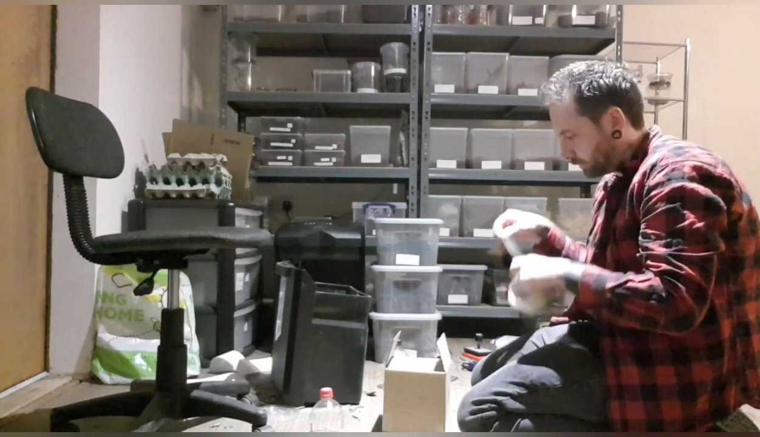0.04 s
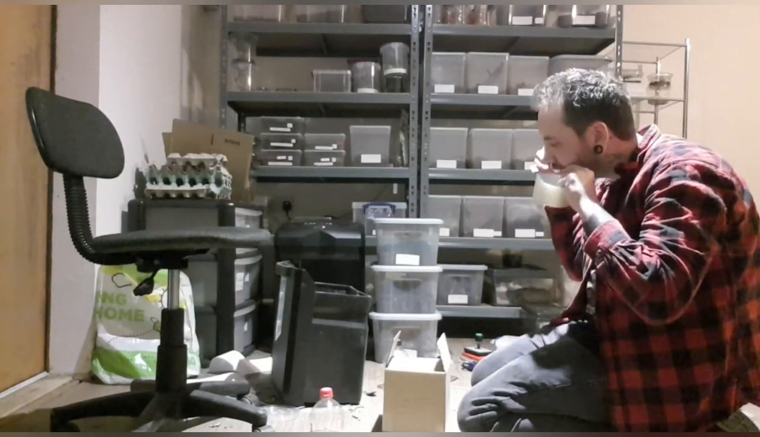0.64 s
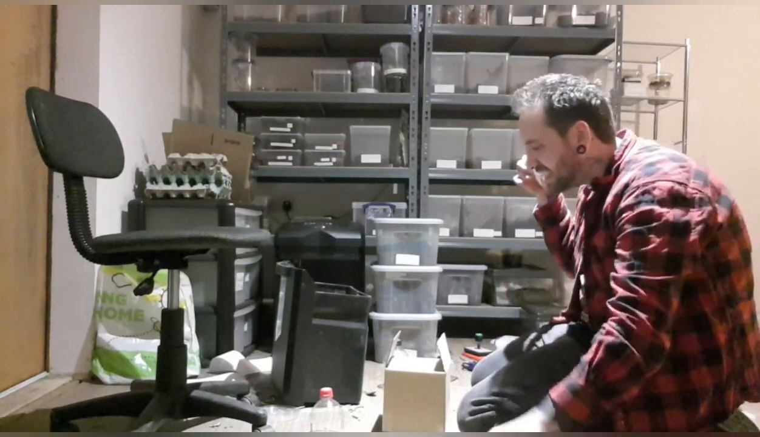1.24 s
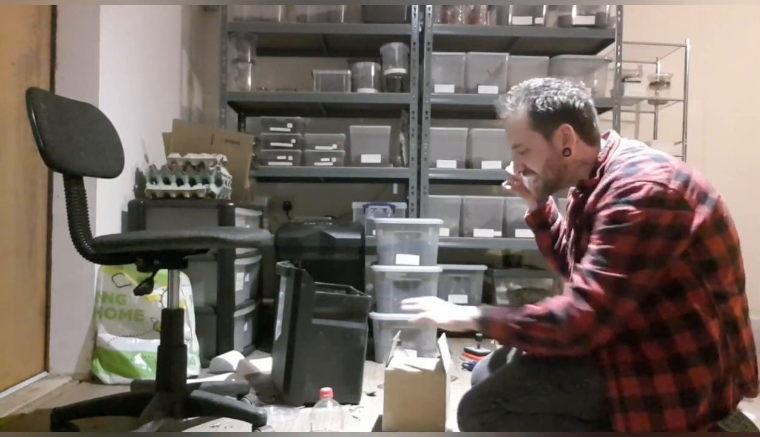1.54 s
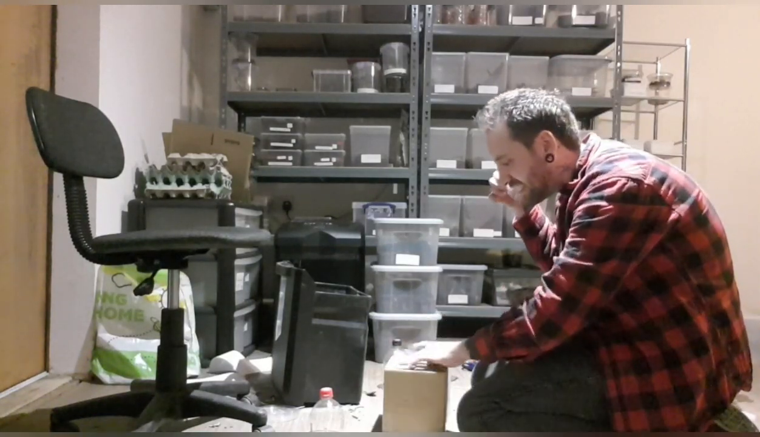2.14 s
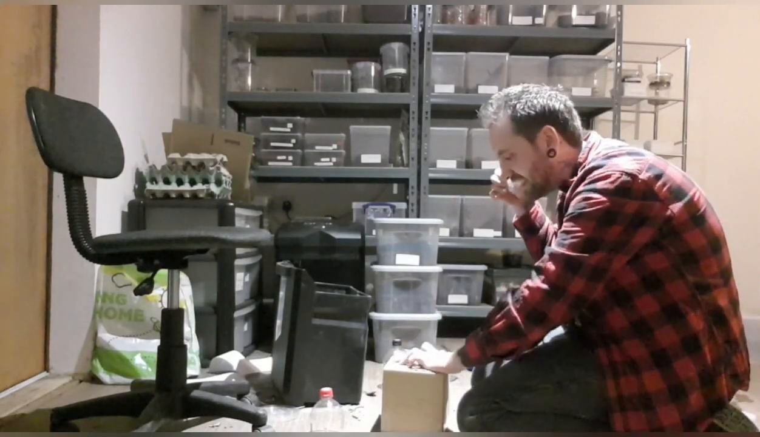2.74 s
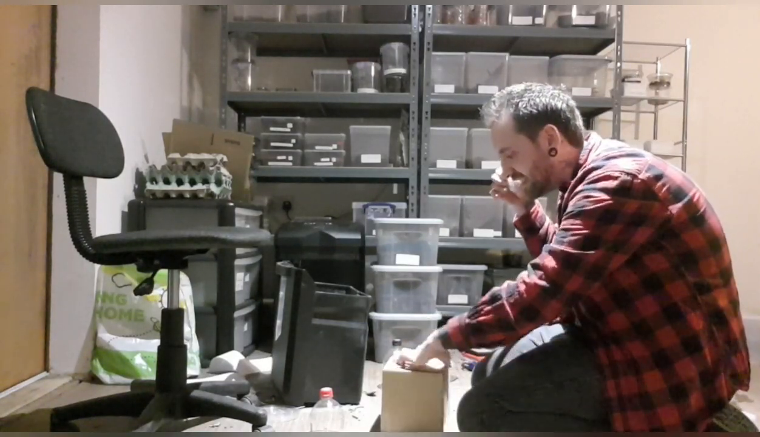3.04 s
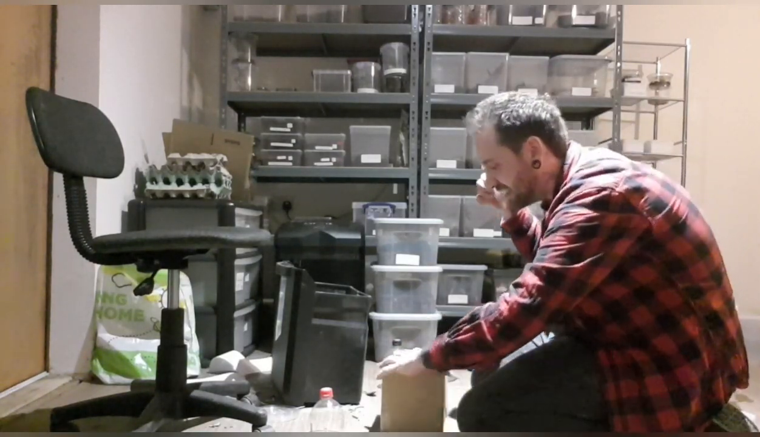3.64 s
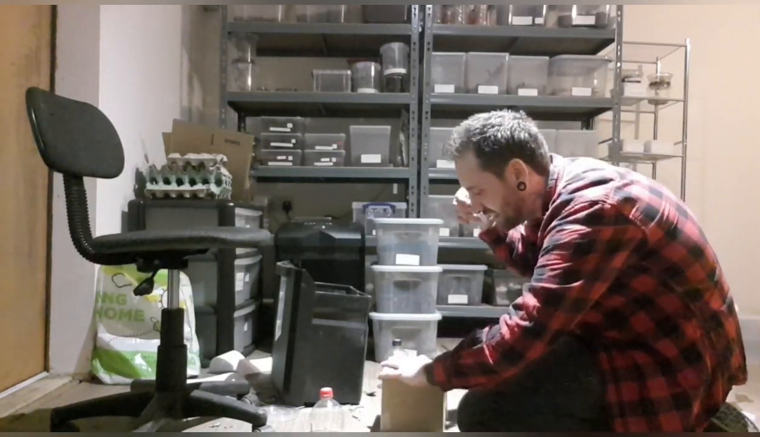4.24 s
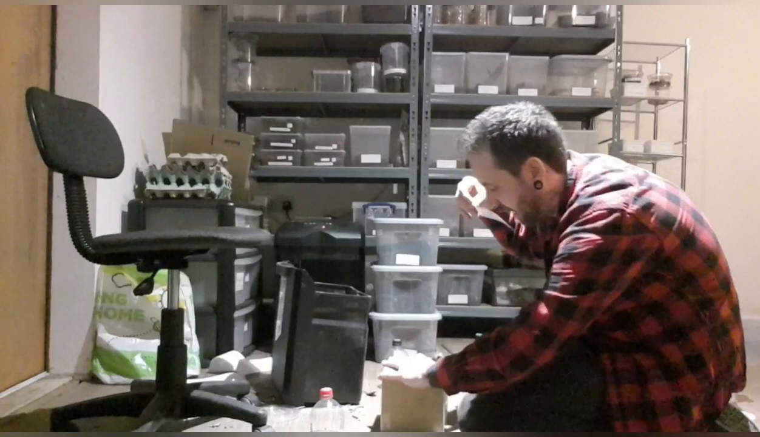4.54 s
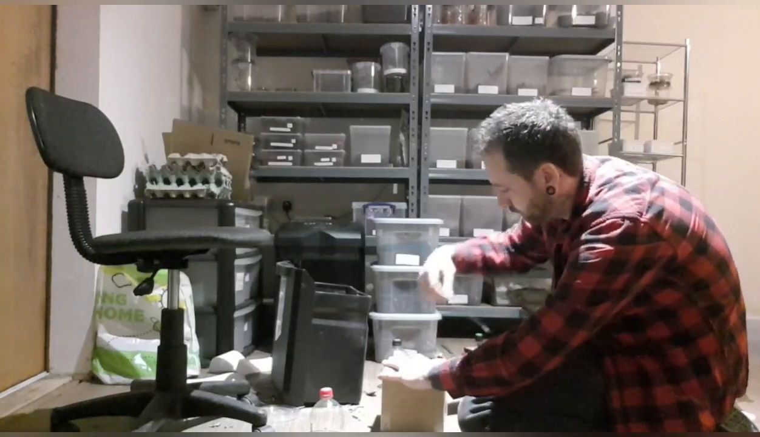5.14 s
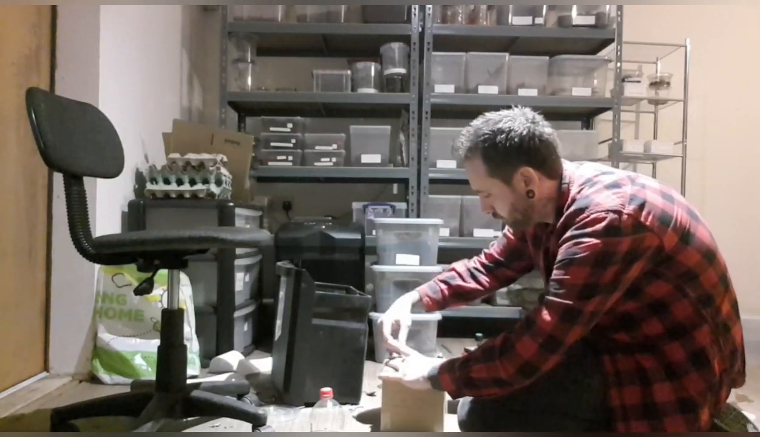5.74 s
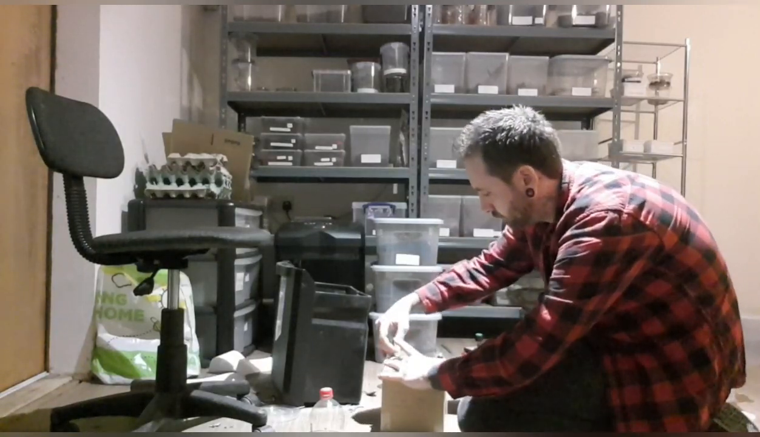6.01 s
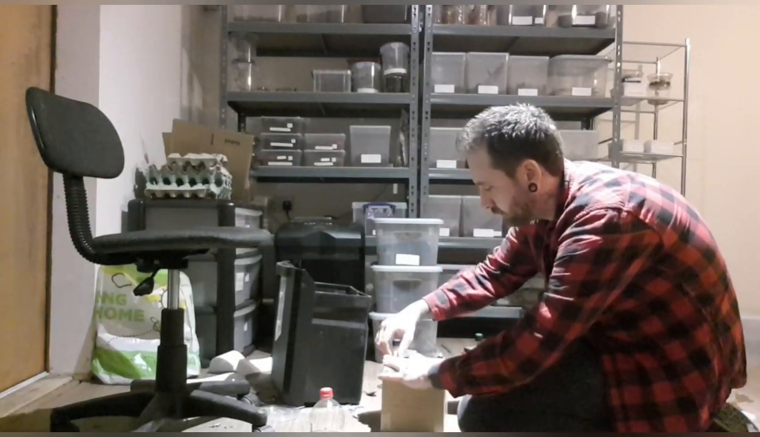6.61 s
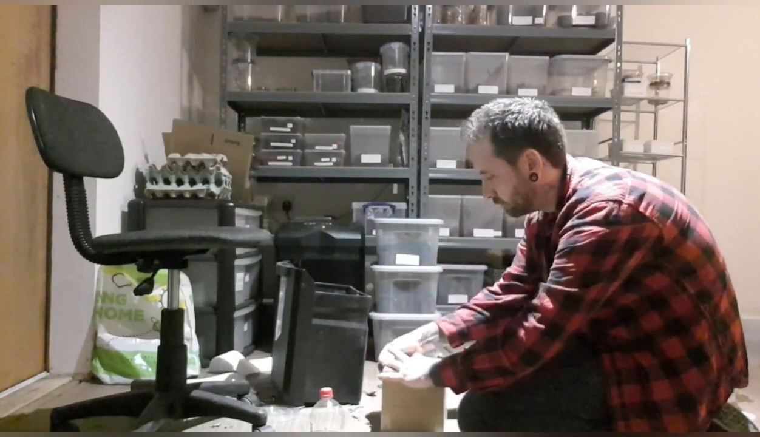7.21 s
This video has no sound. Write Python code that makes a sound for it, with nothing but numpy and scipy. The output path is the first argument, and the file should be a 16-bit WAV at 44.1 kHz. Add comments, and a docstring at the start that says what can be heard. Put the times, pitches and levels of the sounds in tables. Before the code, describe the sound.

Packing tape rips briefly and snaps, the roll drops, then a hand pats and rubs tape onto a cardboard box.

```python
"""A small, bare storeroom: packing tape is ripped off its roll and snapped through; the roll drops.
A hand lays the strip on a cardboard box, pats it and rubs it down; the loose end crinkles and is wiped flat.
Peeling and rubbing are stick-slip pulses coloured by tape and cardboard; pats clack the flaps and make the
hollow box boom. The room rings after every sound; the work is a little to the right of the microphone."""
import sys
import numpy as np
from scipy import signal
from scipy.fft import rfft, irfft, next_fast_len
from scipy.io import wavfile

SR = 44100
rng = np.random.default_rng(int(sys.argv[2]) if len(sys.argv) > 2 else 0)


def generate_wav(signal):
    """Clip the signal to [-1, 1] and save it as 16-bit WAV at the path in sys.argv[1]."""
    frames = np.transpose(np.atleast_2d(signal))
    scaled = np.clip(frames, -1, 1) * 32767
    pcm = np.round(scaled).astype(np.int16)
    wavfile.write(sys.argv[1], SR, pcm)


N = 325017
LEAD = SR // 5  # samples before time zero: the pull is already under way
TIME = np.arange(-LEAD, N) / SR
BOX_START_S, TOP_HZ = 1.753, 15950

# Diffuse room sound. Each row: frequency in Hz, left-right correlation.
COHERENCE = [(60, 0.98), (200, 0.55), (350, 0.043), (650, .45), (1300, 0), (4000, 0.0031)]


def tape():
    """Glue lets go in a rattle of slips, radiated by the taut strip; then a tear runs across it."""
    # Each: start in s, length in s, level in dB, run-on in dB below it, run-on fade in dB/s.
    pull_gesture = (-0.0177, 0.0692, -16.5, 11, 205)
    tear_gesture = (.8595, .025, -18.5, 29, 140)
    # Strip peeling and snapping. Each row: frequency in Hz, relative level in dB.
    peel_spectrum = [(53, -49.5), (90, -27), (184, -4.5), (329, -18), (367, -10.5), (519, -8), (566, -3),
                     (617, -4.5), (971, -7), (1600, -3.5), (2260, -2), (5240, -5), (8620, -7), (11200, -6),
                     (15800, -11)]
    snap_spectrum = [(100, -27.5), (250, -17), (470, -15), (570, -1), (800, -3), (1200, -9.5), (1900, 0.5),
                     (2400, -2.5), (3400, 1), (5200, -1), (7500, -0.5), (10000, 0), (12500, -4),
                     (15800, -13.5)]
    pull = room(rip(*pull_gesture) * slips(per_s=1100, spread_db=3), direct_db=-7, spots=6)
    tear = room(rip(*tear_gesture) * slips(per_s=3000, spread_db=5.5), direct_db=-6.5, spots=6)
    return coloured(pull, peel_spectrum) + coloured(tear, snap_spectrum)


def dropped_roll():
    """The cardboard core knocks on the floor and rocks to rest while a low thud swells under it."""
    # Each row: time in s, level in dB.
    impacts = [(1.229, -33.5), (1.243, -34), (1.255, -40.5)]
    # Core knock. Each row: frequency in Hz, relative level in dB.
    core_spectrum = [(40, -25), (90, -14), (240, -7.5), (370, -11), (480, 1), (600, -3), (720, -2),
                     (1200, -9), (1700, -15.5), (3000, -18), (3600, -29.5), (7000, -46), (15000, -49)]
    # Roll and floor. Each row: frequency in Hz, relative level in dB, T60 in s.
    thud_modes = [(132.3, 0, 0.21), (175, -9.5, 0.28), (235, -6, 0.24), (302, -7, 0.25), (680, -9.5, 0.35)]
    knocks, thud = np.zeros((2, len(TIME)))
    for s, db in impacts:
        add(knocks, s, contact(db, t60_s=0.019))
    t = np.arange(SR // 2) / SR
    ring = sum(amp(db - 60 * t / t60_s) * np.sin(2 * np.pi * (hz * t + rng.random()))
               for hz, db, t60_s in thud_modes)
    swell = 1 - np.exp(-(t / 0.0315) ** 2)
    add(thud, impacts[0][0], amp(-26) * ring * swell)
    return coloured(room(knocks, direct_db=-2.5), core_spectrum) + thud


def rubbing():
    """Film hisses and cardboard rasps under the hand; loose tape stirs; a fingertip makes the lid groan."""
    # Hand along the box. Each row: peak time in s, length in s, film level in dB, cardboard level in dB.
    rubs = [(1.753, 0.052, -46, -47), (1.838, 0.17, -42.5, -40), (1.873, 0.036, -25, -35),
            (2.436, 0.58, -56.5, -57), (2.613, 0.18, -44, -52), (2.873, 0.19, -50.5, -46.5),
            (3.025, 0.18, -56.5, -53), (3.328, 0.099, -41, -58.5), (3.498, 0.255, -53, -52.5),
            (3.746, 0.091, -42, -52), (3.889, .13, -46.5, -44), (4.133, 0.11, -53, -53),
            (4.777, 0.074, -60, -53.5), (6.879, 0.2, -48, -55), (7.27, 0.52, -61.5, -67)]
    # Tape ticks after the pull, the torn strip flicks, later the loose end is wiped flat.
    # Each row: peak time in s, length in s, level in dB.
    tape_moves = [(.355, .09, -61.5), (1.145, 0.056, -41), (4.415, 0.2, -53.5), (4.512, .12, -46),
                  (6.706, 0.089, -43.5), (6.777, .07, -35.5), (6.828, .075, -30.5), (7.345, 0.079, -46.5)]
    # Fingertip dragging on the lid; same columns.
    drags = [(2.53, 0.14, -50.5), (3.19, 0.19, -50.5), (3.3, 0.19, -53.5), (4.21, 0.32, -57),
             (4.785, 0.053, -61.5), (5.5, 0.27, -64), (6.87, 0.16, -49.5)]
    # Surfaces. Each row: frequency in Hz, relative level in dB.
    film_spectrum = [(500, -19.5), (1200, -1), (1950, -4), (2800, -4.5), (4000, -1.5), (4550, -1),
                     (5300, -3.5), (7500, -4), (10000, -3), (13000, -3.5), (15800, -9)]
    card_spectrum = [(70, -15.5), (150, -5.5), (250, -3.5), (350, -5), (500, -1), (590, -3), (700, -2),
                     (950, -7.5), (1400, -18), (1850, -9), (2400, -16.5), (5000, -51), (15000, -56)]
    loose_tape_spectrum = [(100, -37.5), (400, -8.5), (800, -9.5), (1500, -7), (2200, -12.5), (3400, -4.5),
                           (4500, -3), (7500, -2), (10000, -4.5), (12500, -4), (15800, -9)]
    lid_spectrum = [(150, -22.5), (340, -6.5), (420, -7), (510, -0.5), (640, -15), (900, -15),
                    (3000, -30.5)]
    peak_s, length_s, film_db, card_db = np.transpose(rubs)
    hiss = strokes(zip(peak_s, length_s, film_db)) * slips(per_s=3000, spread_db=5.5)
    rasp = strokes(zip(peak_s, length_s, card_db)) * slips(per_s=740, spread_db=2.5)
    loose_tape = strokes(tape_moves) * slips(per_s=3700, spread_db=8)
    groan = strokes(drags) * slips(per_s=230, spread_db=4.5)
    return (coloured(room(hiss, direct_db=-4.5), film_spectrum)
            + coloured(room(rasp, direct_db=-3.5), card_spectrum)
            + coloured(room(loose_tape, direct_db=-3), loose_tape_spectrum)
            + coloured(room(groan, direct_db=-16, spots=2), lid_spectrum))


def patting():
    """A pat clacks the flaps and pushes the hollow box into a short boom, alike in both channels."""
    # Low room resonance and the hollow box's modes.
    # Each row: frequency in Hz, bandwidth in Hz, relative level in dB.
    boom_modes = [(53.6, 5.3, -3.5), (88.3, 12.6, 13), (159, 53, -27), (271, 70, -6)]
    # Struck flap. Each row: frequency in Hz, relative level in dB.
    flap_spectrum = [(70, -14), (140, -3.5), (270, 0.5), (370, -6), (500, 4.5), (590, 2), (720, 6),
                     (950, -3.5), (1250, -5.5), (1550, -12), (1930, -8.5), (2600, -19.5), (4000, -17.5),
                     (4530, -12), (5300, -17.5), (15000, -40.5)]

    def resonances(hz):
        return sum((-1) ** k * amp(db) * 1j * hz * width_hz / (mode_hz ** 2 - hz ** 2 + 1j * hz * width_hz)
                   for k, (mode_hz, width_hz, db) in enumerate(boom_modes))

    t = np.arange(SR // 4) / SR
    push = t * amp(-60 * t / 0.0039)
    boom = filtered(push, resonances)
    boom *= np.sqrt(SR / 30) / np.linalg.norm(boom)
    clacks, booms = np.zeros((2, len(TIME)))
    for s, clack_db, thump_db in hand_contacts():
        add(clacks, s, contact(clack_db, t60_s=0.035))
        add(booms, s, amp(thump_db) * boom)
    flaps = coloured(room(clacks, direct_db=-9.5), flap_spectrum)
    return flaps + room(booms, direct_db=-2, spots=1).mean(axis=0)


def hand_contacts(palm_lag_s=0.028, softer_db=4.5, touches_per_s=3.8):
    """Rows of time in s, clack in dB, thump in dB: fingers then palm per pat, and random light touches."""
    # Each row: time in s, finger clack in dB, palm thump in dB.
    pats = [(1.8, -39, -43.5), (1.87, -37, -57), (2.132, -48, -58), (2.293, -51, -60), (2.427, -50, -47.5),
            (2.575, -55, -53.5), (2.769, -55, -76), (2.81, -45.5, -49.5), (2.96, -52.5, -53.5),
            (3.475, -62, -58), (3.765, -55.5, -53), (3.915, -61, -58), (4.106, -59, -44.5),
            (4.762, -60.5, -50), (6.026, -66.5, -68), (7.11, -61.5, -59.5)]
    fingers = [(s, clack_db, thump_db - softer_db) for s, clack_db, thump_db in pats]
    palms = [(s + palm_lag_s, clack_db - softer_db, thump_db) for s, clack_db, thump_db in pats]
    touches = []
    for slot_s in np.arange(BOX_START_S, TIME[-1], 1 / touches_per_s):
        s = slot_s + rng.random() / touches_per_s
        force_db = rng.uniform(-6, 6)
        touches.append((s, -75.5 + force_db, -68.5 + force_db))
    return fingers + palms + touches


def crinkling():
    """The film buckles with a crack; dent size sets its brightness, and harder cracks are broader."""
    # Each row: time in s, level in dB, centre in Hz, direct sound in dB re the echo.
    buckles = [(1.14, -49, 5000, -1), (2.134, -55.5, 9700, -5), (2.557, -43, 9000, -8),
               (3.212, -56, 8700, -3), (3.345, -44, 9800, -1), (3.935, -41.5, 8400, -1),
               (4.321, -47.5, 11400, -12), (4.997, -54.5, 7100, -9), (5.805, -47, 5730, -17),
               (6.041, -63, 4770, 2.5), (6.886, -43.5, 7050, 8)]
    out = np.zeros((2, len(TIME)))
    hz = np.geomspace(100, TOP_HZ, num=40)
    for s, db, centre_hz, direct_db in buckles:
        width_octaves = 0.43 * 2 ** ((db + 53) / 9)  # doubles every 9 dB
        dent_db = -20 * np.log10(1 + (np.log2(hz / centre_hz) / width_octaves) ** 2)
        crack = np.pad(contact(db, t60_s=0.03), (0, SR // 2))
        add(out, s, coloured(room(crack, direct_db), np.column_stack([hz, dent_db])))
    return out


def fizzing(start_s=1.95, end_s=3.6, fade_20db_s=0.44):
    """Tiny bonds of glue make and break while the hand bears on the fresh strip."""
    # Each row: frequency in Hz, relative level in dB.
    glue_spectrum = [(2000, -23), (6000, -7.5), (10000, -2.5), (15800, -2)]
    outside_s = np.abs(TIME - np.clip(TIME, start_s, end_s))
    pressure = amp(-60.5 - 20 * outside_s / fade_20db_s) * (TIME > BOX_START_S)
    bonds = pressure * slips(per_s=720, spread_db=5.5)
    return coloured(room(bonds, direct_db=-4.5, spots=2), glue_spectrum)


def raised_background():
    """Low rumble, a faint 2 kHz whirr and hiss rise once work on the box begins."""
    # Each row: frequency in Hz, relative level in dB.
    rumble_spectrum = [(25, -4), (55, 11.5), (100, 8), (250, -1.5), (500, -3.5), (1200, -10), (1930, 2),
                       (2500, -6.5), (5000, -13), (15000, -13)]
    noise = slips(per_s=950, spread_db=5) * (TIME > BOX_START_S)
    return amp(-69) * coloured(room(noise, direct_db=-14.5, spots=2), rumble_spectrum)


def background():
    """Faint room rumble and microphone hiss; the channels share the bass."""
    # Each row: frequency in Hz, relative level in dB.
    quiet_spectrum = [(25, -9), (58, 4.5), (90, -3), (135, -15.5), (260, -14), (500, -20), (1550, -24),
                      (1930, -10), (2300, -22), (5000, -27.5), (9000, -33), (12500, -26.5), (15800, -26.5)]
    noise = coloured(rng.standard_normal((3, len(TIME))), quiet_spectrum)
    common = filtered(noise[0], lambda hz: np.sqrt(along(COHERENCE, hz)))
    separate = filtered(noise[1:], lambda hz: np.sqrt(1 - along(COHERENCE, hz)))
    return amp(-72) * (common + separate)


def rip(start_s, length_s, db, run_on_db, fade_db_per_s):
    """Gain of a rip: it bites, holds, lets go and runs on faintly as the tape slackens."""
    attack_20db_s, release_20db_s = 0.002, 0.032
    early_s = np.maximum(start_s - TIME, 0)
    late_s = np.maximum(TIME - start_s - length_s, 0)
    release_db = np.minimum(20 * late_s / release_20db_s, run_on_db + fade_db_per_s * late_s)
    return amp(db - 20 * early_s / attack_20db_s - release_db)


def strokes(rows, swell_share=0.53, roundness=1.4):
    """Gain of strokes: each swells to its peak and lets go, 20 dB down at both ends."""
    power = np.zeros(len(TIME))
    t = np.arange(-LEAD, 2 * LEAD) / SR
    for peak_s, length_s, db in rows:
        from_peak = np.maximum(-t / swell_share, t / (1 - swell_share)) / length_s
        add(power, peak_s + t[0], amp(db - 20 * from_peak ** roundness) ** 2)
    return np.sqrt(power)


def slips(per_s, spread_db):
    """Pulses of random time, size and sign, as in stick-slip; rms 1."""
    hit = rng.random(len(TIME)) < per_s / SR
    size = amp(spread_db * np.clip(rng.standard_normal(len(TIME)), -2, 2))
    pulses = hit * size * rng.choice([-1, 1], len(TIME))
    return pulses / np.sqrt(np.mean(pulses ** 2) + 1e-20)


def contact(db, t60_s):
    """A dying burst of roughness; db is its energy spread over 1/30 s."""
    t = np.arange(SR // 20) / SR
    burst = rng.standard_normal(len(t)) * amp(-60 * t / t60_s)
    return amp(db) * burst * np.sqrt(SR / 30) / np.linalg.norm(burst)


def room(x, direct_db, spots=4):
    """Scatter a white excitation over several spots, each with its own echo."""
    spot = rng.integers(spots, size=len(x))
    return sum(signal.oaconvolve((x * (spot == k))[None], echo(direct_db), axes=1)[:, :len(x)]
               for k in range(spots))


def echo(direct_db):
    """Stereo response from one spot: direct sound and a dense tail off the walls."""
    # Each row: frequency in Hz, T60 in s.
    wall_decay = [(80, 0.33), (300, 0.29), (900, 0.37), (4500, 0.43), (8000, 0.38), (12000, .34),
                  (16000, 0.23)]
    hz, t, bands = signal.stft(rng.standard_normal((2, SR // 2)), SR, nperseg=512)
    decay = amp(-60 * t / along(wall_decay, hz)[:, None])
    width_rad = np.arccos(along(COHERENCE, hz)) / 2
    mid_side_gain = np.array([np.cos(width_rad), np.sin(width_rad)])[:, :, None]
    mid, side = signal.istft(bands * decay * mid_side_gain, SR, nperseg=512)[1]
    response = np.array([mid + side, mid - side])
    response /= np.linalg.norm(response[0])
    shade = np.exp(-np.arange(16) / 2)  # the shaded left side loses direct treble
    response[0, :len(shade)] += amp(direct_db) * shade / shade.sum()
    response[1, 0] += amp(direct_db)
    return response * np.sqrt(2) / np.linalg.norm(response)


def coloured(x, spectrum):
    """Minimum-phase filter with this spectrum; keeps the power of white noise."""
    def response(hz):
        cepstrum = irfft(np.log(amp(along(spectrum, hz))))
        half = len(cepstrum) // 2
        cepstrum[1:half] *= 2
        cepstrum[half + 1:] = 0
        gain = np.exp(rfft(cepstrum))
        return gain / np.sqrt(np.mean(np.abs(gain) ** 2))
    return filtered(x, response)


def filtered(x, response):
    """Apply response(hz) by FFT."""
    size = 2 * next_fast_len(x.shape[-1] // 2 + SR // 8, True)
    hz = np.fft.rfftfreq(size, 1 / SR)
    return irfft(rfft(x, size) * response(hz), size)[..., :x.shape[-1]]


def along(points, hz):
    """Interpolate rows of Hz and value on a log frequency axis."""
    points_hz, values = np.transpose(points)
    return np.interp(np.log(hz + 1), np.log(points_hz + 1), values)


def add(out, s, x):
    """Mix x in at time s."""
    part = out[..., LEAD + round(s * SR):][..., :x.shape[-1]]
    part += x[..., :part.shape[-1]]


def amp(db):
    """Decibels to gain."""
    return 10 ** (np.asarray(db) / 20)


def scene():
    """Pull, tear, drop the roll, then tape the box."""
    work = tape() + dropped_roll() + rubbing() + fizzing() + patting() + crinkling()
    return (work + background() + raised_background())[:, LEAD:]


def record(dry):
    """Stereo microphone: more treble on the right, a dip near 9 kHz and a steep band limit."""
    # Each row: frequency in Hz, gain in dB.
    treble_dip = [(7800, 0.5), (8300, -6.5), (10000, -4.5), (11500, 1)]
    # Each row: frequency in Hz, left minus right in dB.
    balance = [(110, 1.5), (400, 1.5), (700, -3.5), (1300, -3.5), (2400, -2), (4400, -7), (8100, -2.5),
               (15000, -6)]

    def response(hz):
        gain_db = along(treble_dip, hz) + along(balance, hz) * np.array([[0.5], [-0.5]])
        return amp(gain_db) / np.sqrt(1 + (hz / TOP_HZ) ** 300)
    return filtered(dry, response)


dry = scene()
out = record(dry)
generate_wav(out)
```